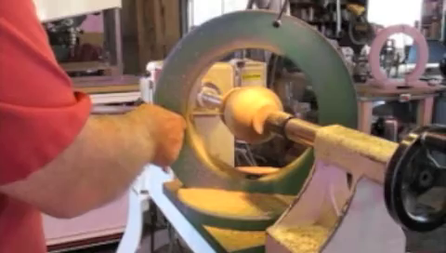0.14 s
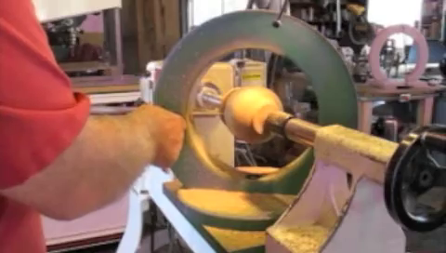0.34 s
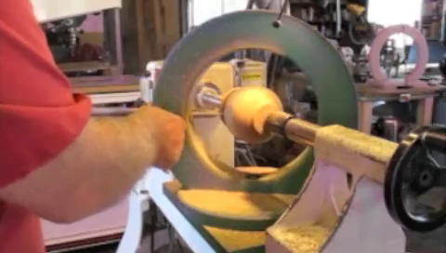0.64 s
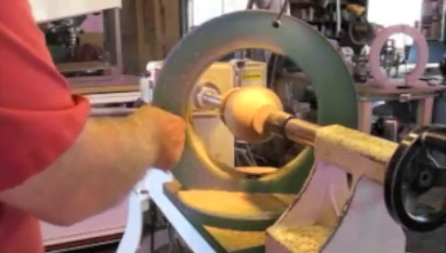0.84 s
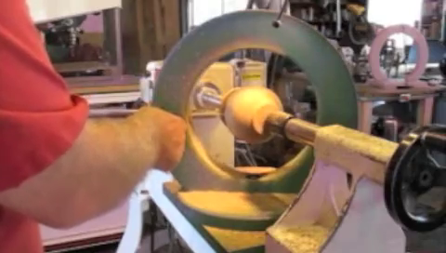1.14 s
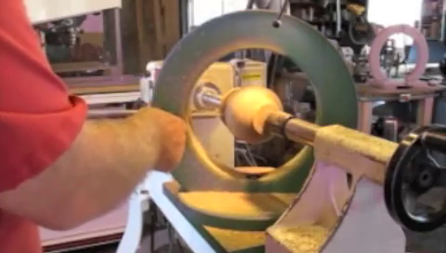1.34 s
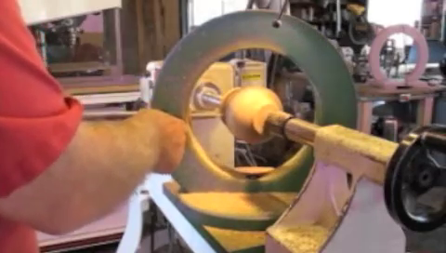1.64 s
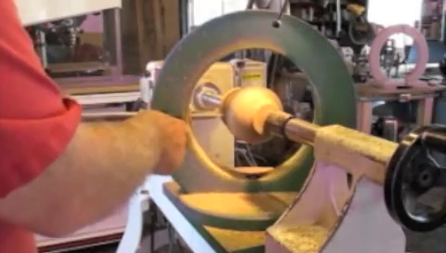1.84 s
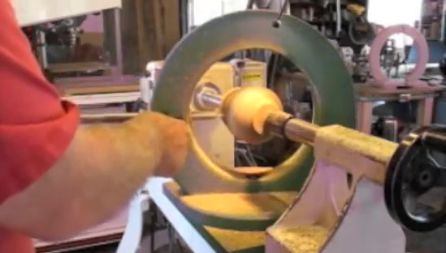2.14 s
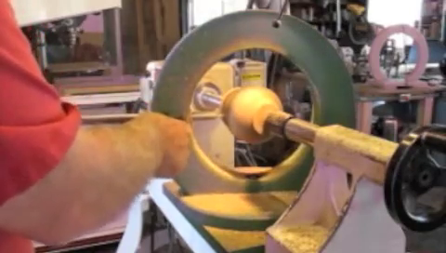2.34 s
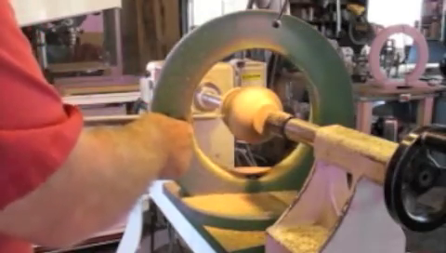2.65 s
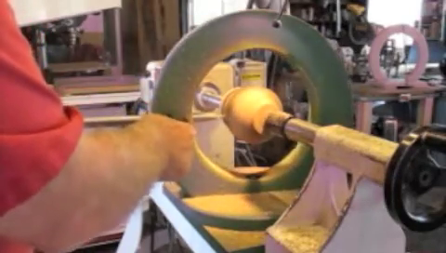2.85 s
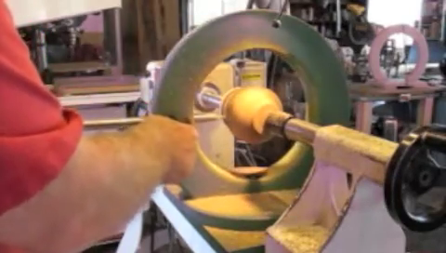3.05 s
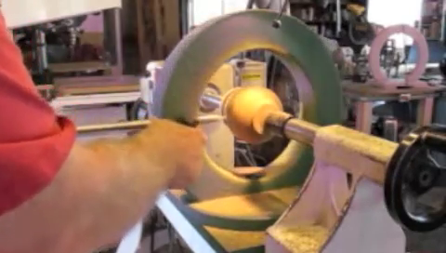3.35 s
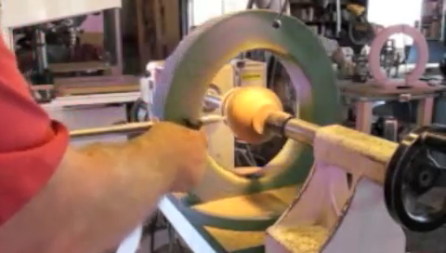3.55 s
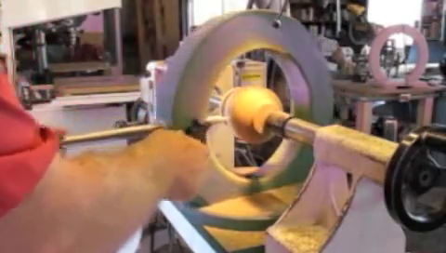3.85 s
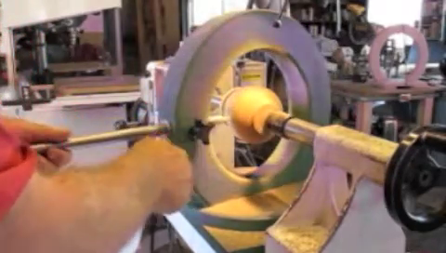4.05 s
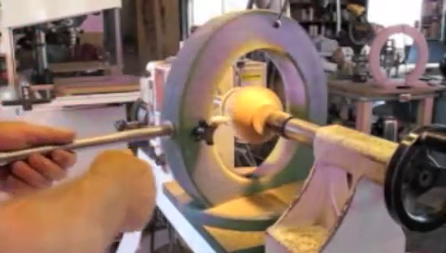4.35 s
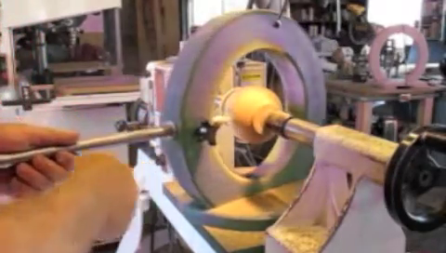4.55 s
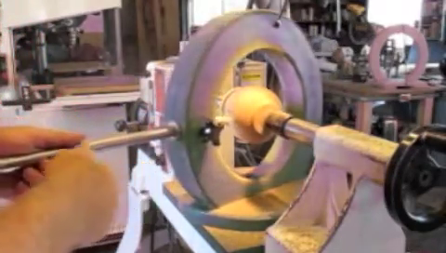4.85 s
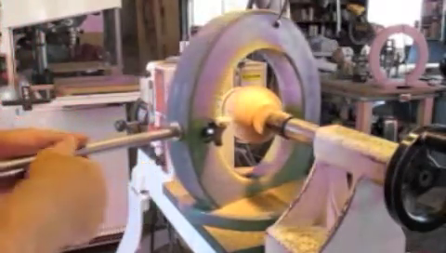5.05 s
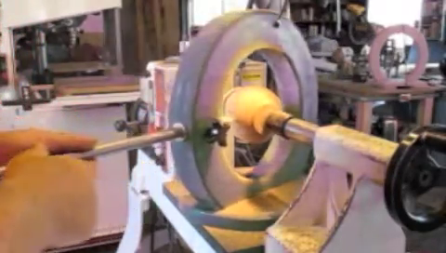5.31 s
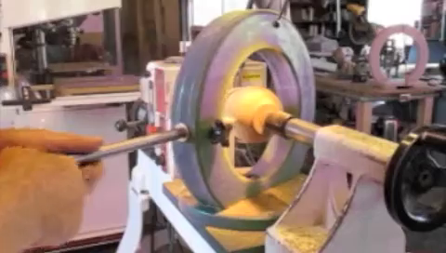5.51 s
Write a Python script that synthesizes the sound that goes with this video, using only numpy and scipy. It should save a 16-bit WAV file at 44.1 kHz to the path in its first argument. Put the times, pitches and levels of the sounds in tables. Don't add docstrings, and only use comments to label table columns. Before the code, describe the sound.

Close, bright, fluttering scrape of steel on turning wood, a short pause of humming, whining lathe motor, then a second ringing scrape.

```python
import sys
import numpy as np
from scipy import signal
from scipy.fft import rfft, irfft, next_fast_len
from scipy.io import wavfile
from scipy.ndimage import uniform_filter1d

SR = 44100
rng = np.random.default_rng(int(sys.argv[2]) if len(sys.argv) > 2 else 0)


def dump(signal):
    limited = np.clip(np.atleast_2d(signal).T, -1, 1)
    pcm = np.round(limited * 32767).astype(np.int16)
    wavfile.write(sys.argv[1], SR, pcm)


def volts(x):
    e = np.asarray(x, float) / 20
    return 10 ** e


N = 250488

# time in seconds, squeal of the bar in dB, depth of cut in dB.
FIRST_PATH = [
    (0.0, -24.5, 4.5),
    (0.5, -23, -0.5),
    (1.15, -23.5, -0.7),
    (1.4, -24, 5),
    (1.73, -24, -0.5),
    (2.03, -24, 3.5),
    (2.6, -23, -5),
    (2.86, -22, -10),
    (3.012, -20, -12),
]
# dB under the squeal, share of the depth.
FIRST_BANDS = [
    (-9, 0.39),
    (-9, 0.7),
    (-24.5, 0.36),
]
# Hz, width in Hz, then dB at start, middle and end of the pass.
FIRST_MODES = [(533, 11.5, -22, -17.5, -13.5), (676, 90, -17.5, -18, -45), (1190, 190, -20, -14.5, -13.5),
               (1936, 95, -8.5, -8.5, -11), (2290, 170, -11.5, -16.5, -9), (2543, 76, -16, -7, -9.5),
               (3664, 193, -8.5, -13, -16.5), (3882, 63, -4, -7, -3.5), (4490, 49, -22, -33, -23),
               (5383, 245, -2.5, -5.5, -3), (5554, 276, -6, -12.5, 0), (7127, 190, -0.5, 0.5, -1.5),
               (8354, 210, -1.5, -5.5, -10.5), (8620, 154, -4, 2.5, 1), (10117, 237, -1, -5, -6.5),
               (12420, 390, -21.5, -22, -19), (14840, 260, -26.5, -41, -36)]
# times a turn, then dB and phase in radians for body, middle, ring.
FIRST_GRAIN = [(1, 1.2, -1.1, 0.1, -2.0, 0.5, 2.1), (2, 0.6, 3.0, 0.5, 2.4, 0.8, 1.6),
               (3, 0.1, -3.0, 0.1, -1.7, 0.2, -2.3), (4, 0.1, 0.9, 0.2, -3.1, 0.3, -2.8)]
FIRST_THROB = [
    (0.6, 2.6),
    (0.9, 2.0),
    (1.8, 1.1),
]


def first_pass():
    return cut(FIRST_PATH, FIRST_BANDS, FIRST_MODES, FIRST_GRAIN, FIRST_THROB,
               turns_per_s=14.85, knot_turn=0.15, tearing_db=[1.0, -2.3, 1.5, -3])


# time in seconds, squeal of the bar in dB, depth of cut in dB.
SECOND_PATH = [
    (3.879, -18.5, -4),
    (3.96, -21, 2),
    (4.05, -21.5, -3.5),
    (4.5, -21.5, -0.5),
    (4.9, -22, 1.6),
    (5.3, -23, 3.5),
    (5.46, -24, 4),
    (5.56, -26, 7),
    (5.68, -23, 3),
]
# dB under the squeal, share of the depth.
SECOND_BANDS = [
    (-13, 0.9),
    (-15.5, 0.93),
    (-25, 1.04),
]
# Hz, width in Hz, then dB at start, middle and end.
SECOND_MODES = [(519, 46, -21, -18.5, -23.5), (857, 47, -19, -13.5, -10), (1267, 135, -16.5, -20, -13.5),
                (2000, 91, -16.5, -14.5, -9.5), (2362, 76, -9, -10.5, -14), (2606, 52, -25, -12.5, -5.5),
                (3090, 80, -22, -15, -21), (3410, 78, -13, -8.5, -11), (3868, 81, -7.5, -5.5, 0.5),
                (4386, 45, -7, -9, -8), (5485, 240, -7.5, -3.5, -4.5), (6780, 164, 4, -20.5, 2.5),
                (7200, 224, -21, -1.5, 0.5), (8080, 114, -1, 1.5, 0), (8663, 95, 9, 6, 8),
                (10310, 145, -3, -2, -0.5), (12570, 310, -22, -30.5, -15), (15000, 300, -36, -54, -38)]
# times a turn, then dB and phase in radians for body, middle, ring.
SECOND_GRAIN = [(1, 1.8, 2.7, 0.3, 2.0, 0.2, 2.8), (2, 1.3, -0.1, 0.9, -0.1, 0.5, -0.5),
                (3, 0.5, -3.0, 0.7, 2.0, 0.8, 2.7), (4, 0.4, 0.3, 0.3, -1.0, 0.3, -0.7)]
SECOND_THROB = [
    (1.3, 1.5),
    (1.2, 1.3),
    (1.2, 1.2),
]


def second_pass():
    return cut(SECOND_PATH, SECOND_BANDS, SECOND_MODES, SECOND_GRAIN, SECOND_THROB,
               turns_per_s=14.88, knot_turn=0.48, tearing_db=[-7.0, -2, -4.5, -0.5])


def cut(path, bands, modes, grain, throb, turns_per_s, knot_turn, tearing_db):
    s, ring_db, depth_db = np.transpose(path)
    start, end = s[0], s[-1]
    span = slice(round(start * SR), min(round(end * SR), N))
    t = np.arange(N)[span] / SR

    sound = tearing_and_ringing(t, span, modes, tearing_db, start, end)
    sound = signal.sosfilt(signal.butter(2, 170, "high", fs=SR, output="sos"), sound)

    levels = [ring_db]
    for under_db, share in bands:
        levels.append(ring_db + under_db + share * depth_db)
    body_level_db = np.interp(t, s, levels[2])

    body, middle, ring = grain_throb(t, grain, throb, turns_per_s)
    knots = (np.arange(N // SR * 20) + knot_turn) / turns_per_s
    knock_db = 20 * np.log10(catches(t, body_level_db, knots))
    body = body + knock_db
    middle = middle + 0.4 * knock_db
    ring = ring + 0.08 * knock_db

    skip_db = skips(t)
    out = np.zeros(N)
    for band, level_db, throb_db in zip(split(sound), levels, (ring, middle, body, body)):
        out[span] += rms_one(band * volts(throb_db)) * volts(np.interp(t, s, level_db) + skip_db)

    bite = (t - start + (start == 0)) / 0.0043
    lift = (end - t + (span.stop == N)) / 0.0025
    out[span] *= np.clip(np.minimum(bite, lift), 0, 1)
    return out


# Hz, dB per Hz.
TEARING = [(100, -26), (500, -27.5), (1500, -20.5), (2900, -20.5), (4700, -20.5), (6200, -17), (7700, -11),
           (9400, -16.5), (10700, -13), (11300, -56), (12200, -38), (14000, -64), (16000, -48)]


def tearing_and_ringing(t, span, modes, tearing_db, start, end):
    bite = volts(0.37 * drift(3.0) + 1.38 * drift(80))[span]
    snaps = bite * fibres(12000, spread_db=2.0, size=len(t))
    hiss_db = np.interp(t, np.linspace(start, end, 4), tearing_db)
    sound = colour(snaps, TEARING) * volts(hiss_db)
    for k, (hz, width_hz, *along_db) in enumerate(modes):
        own = 0.77 * snaps + 0.62 * bite * rng.standard_normal(len(t))
        mode_db = np.interp(t, np.linspace(start, end, 3), along_db) + 1.1 * drift(3.6)[span]
        sound += (-1) ** k * volts(mode_db) * resonance(own, hz, width_hz)
    return sound


def fibres(per_s, spread_db, size):
    snapping = rng.random(size) < per_s / SR
    strength = volts(spread_db * np.minimum(rng.exponential(1, size), 4.2))
    return rms_one(snapping * strength * rng.choice([-1, 1], size))


def grain_throb(t, grain, throb, turns_per_s):
    times, *shape = np.transpose(grain)
    angle = 2 * np.pi * turns_per_s * np.outer(t, times)
    swells = []
    for k, depth in enumerate(throb):
        level_db, phase = shape[2 * k], shape[2 * k + 1]
        swells.append(np.linspace(*depth, len(t)) * (np.cos(angle + phase) @ level_db))
    return swells


# time in seconds, peak in dB.
CATCHES = [(0.298, -30), (0.5562, -32), (0.6121, -31), (0.7637, -30), (1.003, -28), (1.133, -26),
           (1.6472, -24), (1.8014, -26.5), (1.9375, -29), (2.028, -34), (2.2049, -24), (2.3666, -40),
           (2.439, -27), (2.4968, -30), (2.637, -30), (2.6799, -29), (2.7767, -25), (2.8989, -34),
           (2.9787, -29.5), (3.8841, -25), (4.095, -33), (4.159, -29), (4.399, -44), (4.567, -38),
           (4.9327, -44), (5.052, -45), (5.225, -34), (5.2725, -38), (5.4052, -42), (5.477, -32)]


def catches(t, body_db, knots):
    peak_trim_db, swell_s = -12, 0.008
    knot_db = -42.5 + 1.5 * rng.uniform(-1.1, 1, len(knots))
    gain = np.ones(len(t))
    for s, db in [*CATCHES, *zip(knots, knot_db)]:
        near = slice(*np.searchsorted(t, [s, s + 0.05]))
        age = (t[near] - s) / swell_s
        gain[near] += volts(db + peak_trim_db - body_db[near]) * age * np.exp(1 - age)
    return gain


# time of return in seconds, fade in seconds, loss in dB.
SKIPS = [
    (2.894, .006, -10),
    (2.968, .024, -20),
    (2.996, .004, -14),
    (5.383, .012, -5),
    (5.428, .010, -6),
]


def skips(t):
    regain_s = 0.0024
    level_db = np.zeros(len(t))
    for back, fade_s, loss_db in SKIPS:
        away = np.maximum((back - t) / fade_s, (t - back) / regain_s)
        level_db += loss_db * np.exp(-away)
    return level_db


BAND_EDGES_HZ = 6300, 3000, 950


def split(x):
    size = next_fast_len(len(x))
    grid = np.fft.rfftfreq(size, 1 / SR)
    whole = rfft(x, size)
    rest = 1
    for edge in BAND_EDGES_HZ:
        below = 1 / (1 + (grid / edge) ** 16)
        yield irfft(whole * (rest - below), size)[:len(x)]
        rest = below
    yield irfft(whole * rest, size)[:len(x)]


def resonance(x, hz, width_hz):
    r = np.exp(-np.pi * width_hz / SR)
    zeros = np.array([1, 0, -1]) * (1 - r * r) / 2
    poles = [1, -2 * r * np.cos(2 * np.pi * hz / SR), r * r]
    return signal.lfilter(zeros, poles, x)


def colour(x, spectrum):
    hz, db = np.transpose(spectrum)
    size = next_fast_len(len(x))
    grid = np.fft.rfftfreq(size, 1 / SR) + 1
    shape = volts(np.interp(np.log(grid), np.log(hz), db))
    return irfft(rfft(x, size) * shape, size)[:len(x)]


def drift(per_s):
    r = np.exp(-80 * np.pi * per_s / SR)
    noise = rng.standard_normal(N // 40 + 2002)
    slow = signal.lfilter([1], [1, -2 * r, r * r], noise)[2000:]
    return np.interp(np.arange(N) / 40, np.arange(len(slow)), rms_one(slow))


def rms_one(x):
    return x / np.sqrt(np.mean(x ** 2) + 1e-20)


def shop(x):
    t60_s, level_db, gap_s = 0.37, -6.5, 0.006
    step = SR // 8
    t = np.arange(SR // 2) / SR
    out = np.zeros(N + 2 * SR)
    x = np.pad(x, (step, 2 * step))
    window = np.sqrt(np.hanning(2 * step))
    for i in range(0, N + step, step):
        tail = rng.standard_normal(len(t)) * volts(-60 * t / t60_s) * (t > gap_s)
        wet = signal.fftconvolve(x[i:i + 2 * step] * window, rms_one(tail))
        out[i:i + len(wet)] += wet
    return volts(level_db) * out[step:N + step] / np.sqrt(len(t))


# Hz, rms level in dB.
HUM = [(59, -70), (75.4, -67), (96.9, -61), (118.4, -61), (140, -61), (231.5, -57), (270, -67),
       (286.5, -60), (344.5, -60), (361, -64), (404, -55), (419.9, -50), (463, -63), (521, -60),
       (577.5, -57), (690, -60), (748.3, -53), (809, -59), (919.5, -56), (1020, -58), (1039, -55)]
# Hz, rms level in dB.
WHINE = [(5879, -64), (7628, -74), (9173, -68), (9243, -61), (9388, -58), (9458, -63), (9604, -68),
         (9749, -60), (9819, -51), (9895, -50), (9964, -54), (10034, -51), (10110, -59), (10180, -53),
         (10196, -61), (10271, -66), (10325, -67), (10541, -70), (10610, -64), (10686, -69), (10756, -69),
         (10826, -70)]
# Hz, dB per Hz.
FAN = [(25, -15), (50, -7), (120, -27), (190, -5.5), (320, -10), (500, -4), (650, -0.5), (1200, 1),
       (3000, -10), (5500, -19.5), (8200, -23.5), (9500, -15), (10100, -9), (10900, -22), (11250, -48)]


def motor():
    air_db = -39 + 0.12 * drift(3.9)
    air = volts(air_db) * rms_one(colour(rng.standard_normal(N), FAN))
    hum = tones(HUM, wobble_db=0.5)
    whine = volts(-0.5) * tones(WHINE, wobble_db=2.0)
    return air + hum + whine


def tones(lines, wobble_db):
    t = np.arange(N) / SR
    out = np.zeros(N)
    for hz, db in lines:
        level = np.sqrt(2) * volts(db + wobble_db * drift(2.1))
        out += level * np.sin(2 * np.pi * (hz * t + rng.random()))
    return out


# gain at the bite in dB, rise in dB, bend of the rise.
GAIN_IN_CUT = [
    (-16, 9, 4.3),
    (-16, 9, 3.3),
]


def gain_control():
    pause_db, clamp_s, release_s = 1, 0.076, 0.0097
    t = np.arange(N) / SR
    gain_db = np.full(N, float(pause_db))
    for path, (bite_db, rise_db, bend) in zip((FIRST_PATH, SECOND_PATH), GAIN_IN_CUT):
        start, end = path[0][0], path[-1][0]
        along = np.clip((t - start) / (end - start), 0, 1)
        cutting_s = np.maximum(t - start + (start == 0), 0)
        clamp = 1 - np.exp(-cutting_s / clamp_s)
        release = np.exp(-np.maximum(t - end, 0) / release_s)
        gain_db += clamp * release * (bite_db + rise_db * along ** bend - pause_db)
    return gain_db


# Hz, dB.
DROP_UNDER = [(11000, -66), (11400, -60.5), (12200, -66.5), (13000, -74), (14200, -72.5), (15800, -83.5)]


def drop_faint_bands(x):
    hz, t, cells = signal.stft(x, SR, nperseg=2048, noverlap=1536)
    edges = np.searchsorted(hz, np.arange(11000, 16200, 345))
    at = np.minimum(t * SR, N - 1).astype(int)
    shared_db = 0.84 * drift(6.7)[at]
    for low, high in zip(edges, edges[1:]):
        power = uniform_filter1d(np.mean(np.abs(cells[low:high]) ** 2, axis=0), size=3)
        limit_db = np.interp(hz[low], *np.transpose(DROP_UNDER)) + shared_db + 2.7 * drift(3.6)[at]
        cells[low:high] *= power > volts(limit_db) ** 2
    return signal.istft(cells, SR, nperseg=2048, noverlap=1536)[1][:N]


def scene():
    tool = first_pass() + second_pass()
    gain_db = gain_control()
    tail = shop(tool) * volts(0.12 * np.maximum(gain_db + 13.0, 0))
    return (volts(-0.84) * (tool + tail) + volts(gain_db) * motor())[None]


def roll_off(x):
    return signal.sosfilt(signal.butter(12, 15890, fs=SR, output="sos"), x)


def record(dry):
    rounded = 0.6 * np.tanh(dry[0] / 0.6)
    notch = signal.butter(2, [11500, 12000], "bandstop", fs=SR, output="sos")
    top = signal.ellip(12, 0.5, 50, 15700, fs=SR, output="sos")
    heard = signal.sosfilt(np.vstack([notch, top]), rounded)
    mix = drop_faint_bands(heard)[None]
    return roll_off(mix)


dry = scene()
out = record(dry)
dump(out)
```